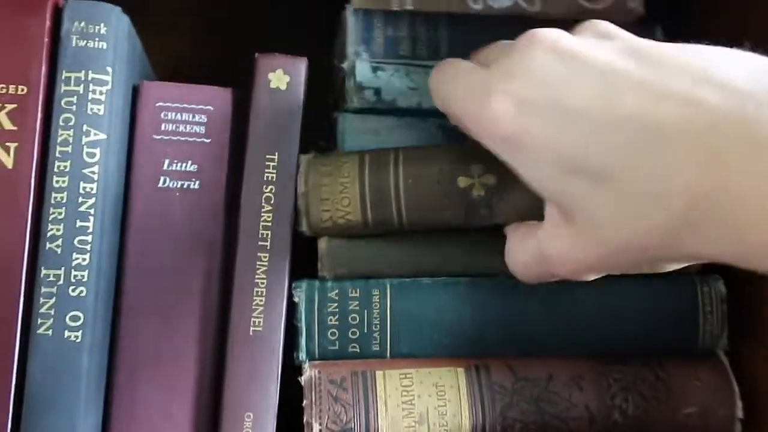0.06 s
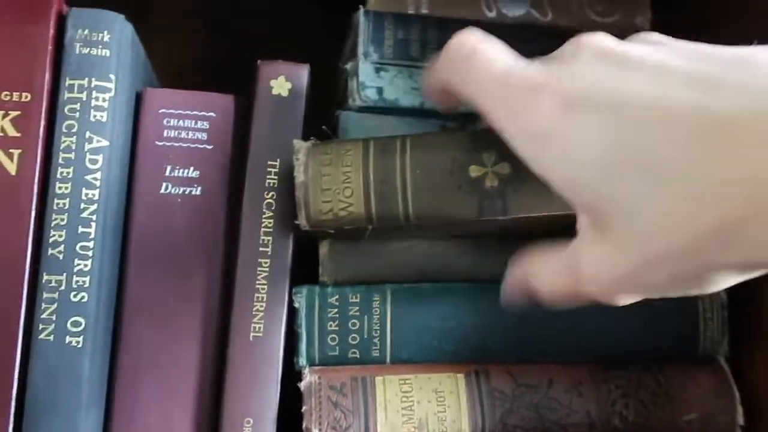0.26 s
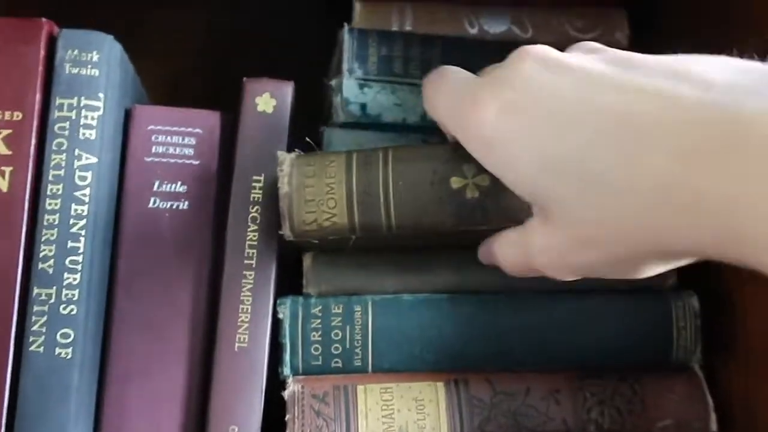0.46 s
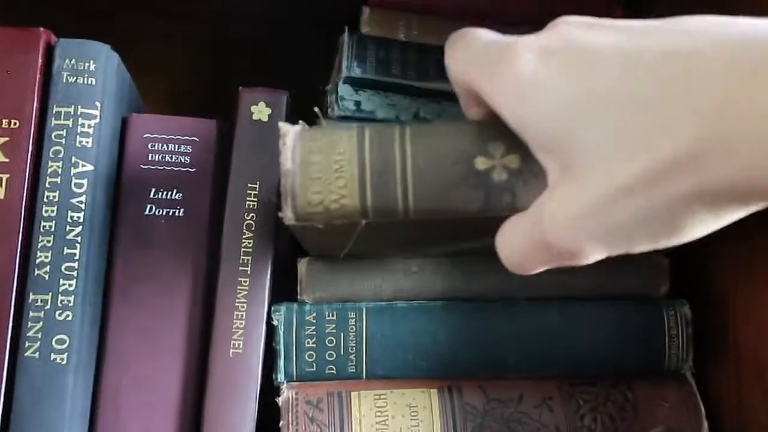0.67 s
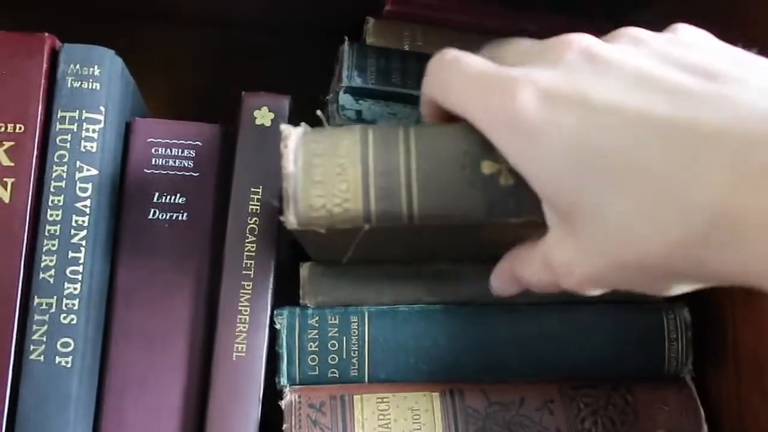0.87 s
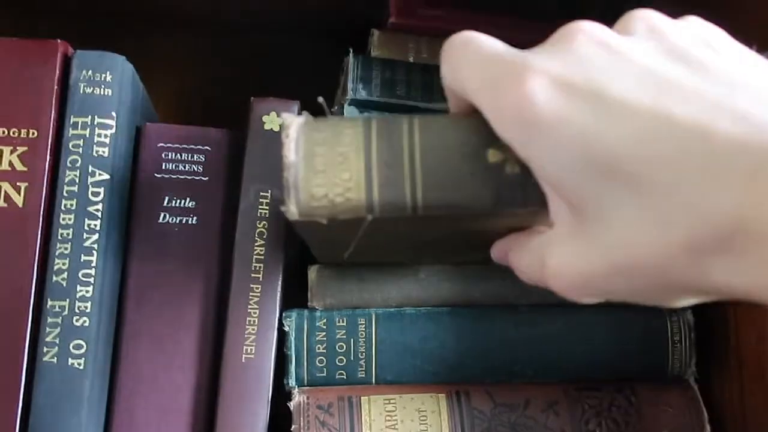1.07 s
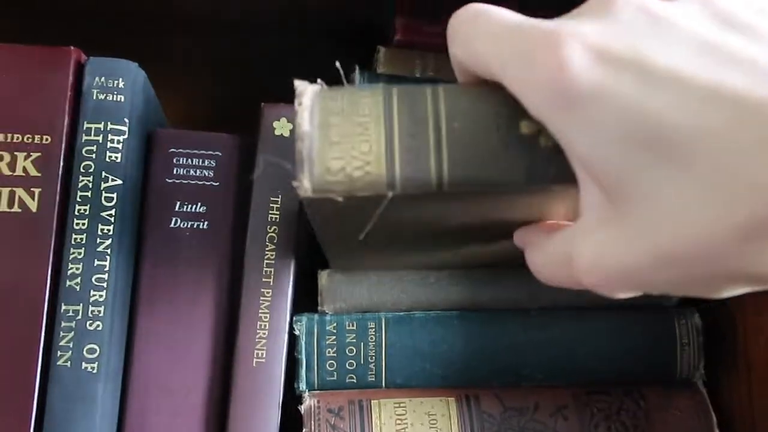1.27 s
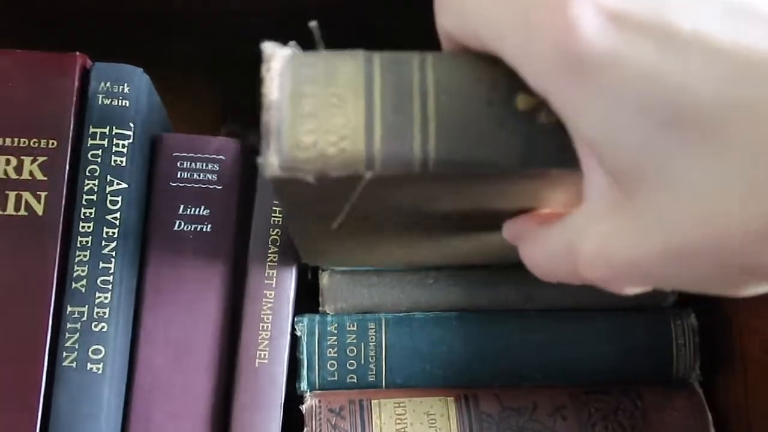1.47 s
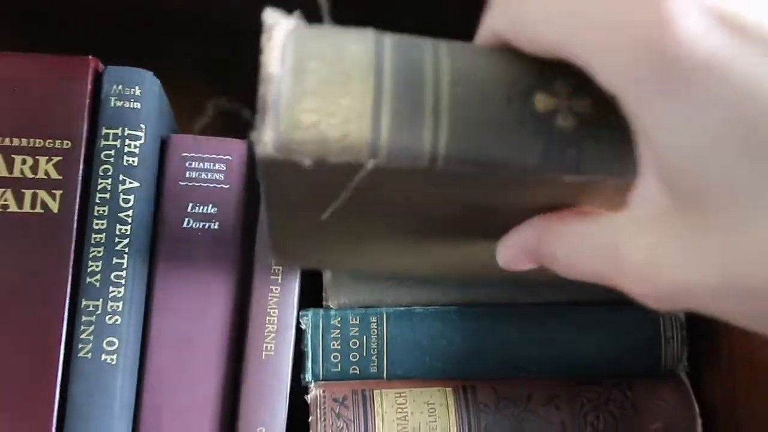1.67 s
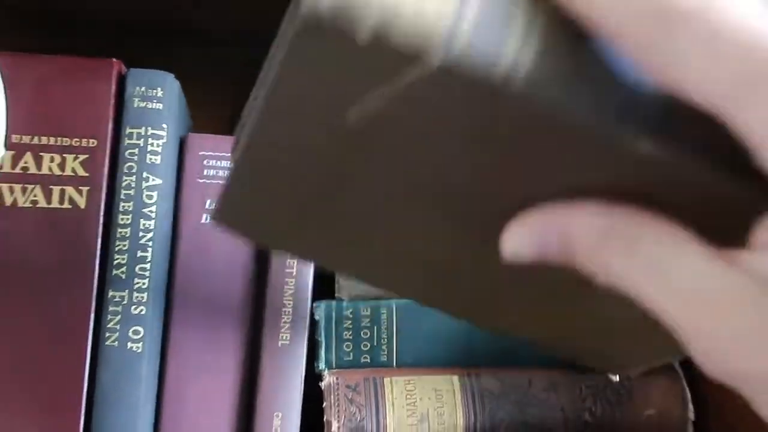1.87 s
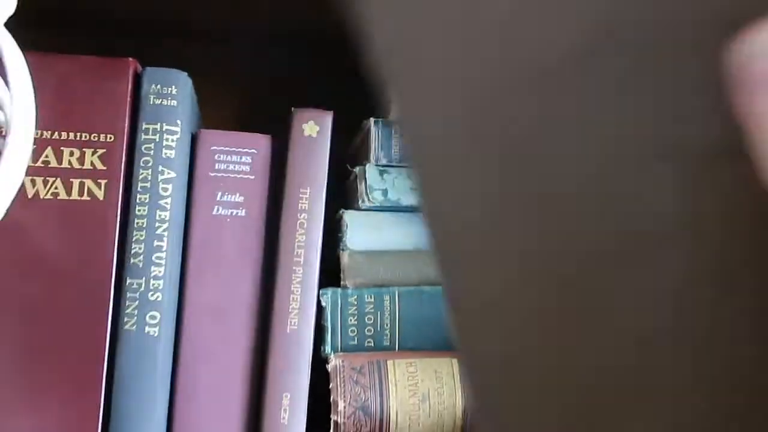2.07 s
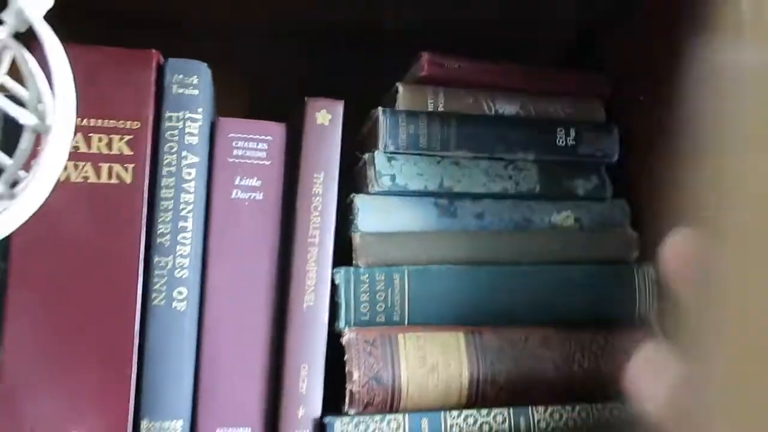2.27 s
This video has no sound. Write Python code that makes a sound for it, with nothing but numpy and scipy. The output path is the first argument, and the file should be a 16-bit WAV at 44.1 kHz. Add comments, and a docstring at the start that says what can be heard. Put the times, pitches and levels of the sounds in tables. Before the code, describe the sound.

A hardcover book is worked out of a tight stack: a burst of heavy knocks, smaller thumps in the middle, light cloth scraping, then one strong double thud and near quiet. Close stereo microphone, small furnished room.

```python
"""A low rubbing rumble and a burst of knocks open the scene: a hardcover book is worked out of a tight stack
on a wooden shelf, close by. Rumble and cloth hiss are filtered noise that follows pressure and speed.
Knocks are damped sines with ringing modes, binding ticks are short noise bursts, one squeak is a rising sine,
and the ribs of the cloth rasp as narrow-band noise. A small room adds a short tail, quiet air and a hum."""
import sys
import numpy as np
from scipy import signal
from scipy.fft import rfft, irfft
from scipy.io import wavfile

SR = 44100
rng = np.random.default_rng(int(sys.argv[2]) if len(sys.argv) > 2 else 0)


def transcribe(u):
    """Save the signal u as a 16-bit wav file named by the first command-line argument.

    u: samples, shape (n,) or (channels, n), limited to [-1, 1]; the rate is SR.
    q: integer samples, one column per channel.
    """
    v = np.clip(np.atleast_2d(u).T, -1, 1)
    q = np.round(v * 32767).astype(np.int16)
    wavfile.write(sys.argv[1], SR, q)


N = 102135  # length in samples


def amp(db):
    """Logarithmic level: converts decibels to an amplitude gain."""
    return 10 ** (np.asarray(db) / 20)


def unit(x):
    """Power normalisation: scales a signal to rms 1."""
    return x / np.sqrt(np.mean(x ** 2) + 1e-20)


def at_hz(points, hz):
    """Interpolation on a logarithmic frequency axis: reads a curve of (f, value) points."""
    f, value = np.transpose(points)
    return np.interp(np.log(hz + 1), np.log(f + 1), value)


def level(points):
    """Amplitude envelope: gain at every sample from a curve of (t/s, level/dB) points."""
    times, db = np.transpose(points)
    return amp(np.interp(np.arange(N) / SR, times, db))


def add(mix, start_s, sound):
    """Superposition: adds a sound to the mix, in place, from its start time."""
    part = mix[..., max(round(start_s * SR), 0):][..., :sound.shape[-1]]
    part += sound[..., :part.shape[-1]]


def colour(x, points):
    """Spectral shaping: filters a signal by a curve of (f/Hz, level/dB) points, then sets rms 1."""
    n = x.shape[-1]
    gain = amp(at_hz(points, np.fft.rfftfreq(n, 1 / SR)))
    return unit(irfft(rfft(x) * gain, n))


def spread(pair, diffuse=False):
    """Interaural coherence: mixes two unrelated signals to a set left-right likeness at each frequency."""
    # left-right likeness of near sounds: f/Hz, likeness (0 to 1)
    near_likeness = [(400, 0.99), (2000, 0.89), (4500, 0.8), (10000, 0.29), (15000, 0.41)]
    diffuse_hz = 427  # room sound is alike below this and differs above it
    n = pair.shape[-1]
    hz = np.fft.rfftfreq(n, 1 / SR)
    if diffuse:
        same = 1 / (1 + (hz / diffuse_hz) ** 3)
    else:
        same = at_hz(near_likeness, hz)
    mid, side = rfft(pair) * np.sqrt([(1 + same) / 2, (1 - same) / 2])
    return irfft(np.array([mid + side, mid - side]), n)


def wander(rate_hz):
    """Low-pass random process: chance variation up to a rate, at rms 1."""
    hz = np.fft.rfftfreq(N, 1 / SR)
    noise = rfft(rng.standard_normal(N))
    return unit(irfft(noise / (1 + (hz / rate_hz) ** 4), N))


def stack_rumble():
    """Friction under load: the pressed stack rubs as low noise whose level follows the pressure."""
    # pressure on the stack as the relative level of its rumble: t/s, level/dB
    pressure = [(0, -16), (.035, -38.5), (.08, -33.5), (.1, -41.5), (.21, -39.5), (.28, -42.5), (.34, -57),
                (.42, -67), (.5, -45.5), (.56, -46.5), (.64, -37.5), (.69, -33.5), (.76, -42), (.83, -38),
                (.92, -54), (.98, -44), (1.03, -55), (1.07, -44.5), (1.19, -45.5), (1.28, -50.5),
                (1.39, -44), (1.47, -35.5), (1.5, -56), (1.54, -43), (1.57, -61), (1.61, -46.5),
                (1.65, -94), (2.1, -59), (2.32, -52.5)]
    # spectrum of the rumble, before scaling to rms 1: f/Hz, level per Hz/dB
    rumble_spectrum = [(25, -57), (60, 11.5), (110, -7), (190, 3.5), (290, 3), (450, -5.5), (700, -7),
                       (1100, -24.5), (5000, -52)]
    rumble_db, flutter_db = 2.5, 2
    noise = colour(spread(rng.standard_normal((2, N))), rumble_spectrum)
    return noise * level(pressure) * amp(rumble_db + flutter_db * wander(rate_hz=160))


def patchy(x):
    """Shifting contact spots: each band of the friction swells and fades by itself."""
    patch_db, patch_rate_hz = 1.9, 9.2
    z, hz = rfft(x), np.fft.rfftfreq(N, 1 / SR)
    centres = np.geomspace(700, 15000, 16)  # Hz
    out = np.zeros((2, N))
    for peak in np.eye(len(centres)):
        # overlapping triangular bands that sum to the full spectrum
        band = irfft(z * np.interp(hz, centres, peak), N)
        out += band * amp(patch_db * wander(patch_rate_hz))
    return out


def through_gap(x):
    """Cavity resonance: the gap between the books rings; its muffling lifts as the book comes out."""
    # resonances of the narrow gap: f/Hz, boost/dB
    gap_modes = [(1560, 1), (2550, 1), (3400, 2), (4470, 5.5)]
    gap_width_hz = 38  # half-width of each boost
    treble_hz, brighten_db_per_s = 3000, 3
    hz = np.fft.rfftfreq(N, 1 / SR)
    boost_db = sum(db / (1 + ((hz - f) / gap_width_hz) ** 2) for f, db in gap_modes)
    z = rfft(x) * amp(boost_db)
    low = 1 / (1 + (hz / treble_hz) ** 2)
    bass, treble = irfft(z * low, N), irfft(z * (1 - low), N)
    # the treble rises steadily and reaches its unchanged level at 2 s
    return bass + treble * amp(brighten_db_per_s * (np.arange(N) / SR - 2))


def cover_hiss():
    """Granular friction: slipping cloth fibres make a dense hiss of random grains over steady noise."""
    # speed of the sliding cover as the relative level of its hiss: t/s, level/dB
    speed = [(0, -41), (.045, -66.5), (.08, -48.5), (.125, -41.5), (.15, -51.5), (.23, -49), (.28, -54.5),
             (.33, -74), (.52, -64), (.55, -47), (.69, -47), (.75, -43), (.78, -55), (.85, -62),
             (1.02, -62), (1.07, -52), (1.28, -51), (1.385, -45.5), (1.42, -49.5), (1.455, -58),
             (1.48, -102), (1.73, -69.5), (1.81, -56.5), (1.87, -61), (1.94, -54), (2.01, -57.5),
             (2.06, -62), (2.32, -64.5)]
    # spectrum of the hiss, before scaling to rms 1: f/Hz, level per Hz/dB
    hiss_spectrum = [(200, -29), (700, 12.5), (1700, 7.5), (2800, 10.5), (4500, 7), (7000, 5), (9500, 0.5),
                     (12500, 0), (15500, -13)]
    grains_per_s, grain_spread_db = 1200, 2.5
    grain_share, flutter_db = 0.32, 1.7  # grains' share of the power; random level variation in dB
    strength = amp(grain_spread_db * np.minimum(rng.exponential(1, (2, N)), 5))
    grains = strength * rng.choice([-1, 1], (2, N))
    grains = grains * (rng.random((2, N)) < grains_per_s / SR)
    noise = rng.standard_normal((2, N))
    slips = np.sqrt(grain_share) * unit(grains) + np.sqrt(1 - grain_share) * noise
    friction = patchy(colour(spread(slips), hiss_spectrum))
    return through_gap(friction) * level(speed) * amp(flutter_db * wander(rate_hz=15))


def background():
    """Diffuse field and frequency modulation: wide room air with a faint hum of wavering tones."""
    # spectrum of the air, before scaling to rms 1: f/Hz, level per Hz/dB
    air_spectrum = [(15, -46), (25, -13), (49, -2.5), (167, -14.5), (293, -8.5), (588, -18.5), (856, -20),
                    (1960, -28), (5140, -38.5), (10000, -49), (15000, -56)]
    # tones of the hum: f/Hz, rms level/dB
    hum_tones = [(58, -58.5), (207, -59.5), (358, -84)]
    air_db = -53.5
    hum = np.zeros(N)
    for hz, db in hum_tones:
        phase = 2 * np.pi * np.cumsum(hz + 3 * wander(rate_hz=11.0)) / SR
        hum += amp(db) * np.sqrt(2) * np.sin(phase)
    air = colour(spread(rng.standard_normal((2, N)), diffuse=True), air_spectrum)
    return hum + amp(air_db) * air


def burst(t, gain, decay):
    """Impulsive noise: a dying cluster of tiny snaps with an imposed, even magnitude spectrum."""
    envelope = np.exp(-t / decay)
    z = rfft(spread(rng.standard_normal((2, len(t)))) * envelope)
    # keep the phases alone, so the magnitude is the given gain
    snaps = irfft(z / (abs(z) + 1e-20) * gain, len(t))
    snaps = snaps * np.exp(-(t / (10 * decay)) ** 2)
    return unit(snaps) * np.sqrt(np.mean(envelope ** 2))


def ring(t, modes, scale=1):
    """Modal synthesis: a sum of sines, each decaying by 60 dB in its t60."""
    return sum(amp(db - 60 * t / t60) * np.sin(2 * np.pi * f * scale * t) for f, db, t60 in modes)


def knocks():
    """Impact excitation: each knock is a damped thud, a clack of board and shelf modes, and a crunch."""
    # knocks: t/s, level/dB, thud f/Hz, thud rise/s, thud decay/s,
    # clack level relative to the thud/dB, cover board f/Hz
    knock_list = [(0.0158, -7, 165.7, 0.0049, 0.018, -68, 452), (0.0239, 10, 298, 0.0017, 0.0015, -25, 430),
                  (0.0371, -10.5, 174, 0.00049, 0.013, -11.5, 388),
                  (0.139, 7, 270, 0.0013, 0.005, -8.5, 675), (0.1625, -4.5, 247, 0.0022, 0.0054, -21, 680),
                  (0.193, -17, 308, 0.00082, 0.0029, -7, 630), (0.263, -40, 400, 0.0012, 0.0018, 4, 925),
                  (0.4359, -28.5, 251, 0.00028, 0.013, -13.5, 577),
                  (0.5179, -1, 197, 0.0031, 0.0021, -54, 415),
                  (0.529, -10.5, 188, 0.0013, 0.0023, -59, 417),
                  (0.681, -6.5, 264, 0.0083, 0.009, -42, 500),
                  (0.7680, 0.5, 483, 0.00051, 0.0015, -13, 802),
                  (0.7795, -1.5, 323, 0.0026, 0.0033, -13, 715),
                  (0.791, -8.5, 230, 0.0042, 0.0065, -11, 696),
                  (0.829, -21.5, 493, 0.0029, 0.0086, -8.5, 568),
                  (1.4411, 13, 189.5, 0.0036, 0.0031, -39, 568),
                  (1.4448, -6, 185, 0.0033, 0.0061, -5.5, 544),
                  (1.4530, 7.5, 267, 0.0018, 0.0033, -20.5, 619),
                  (1.521, -16, 430, 0.0031, 0.0039, -12.5, 598)]
    # heavily damped modes of the cover board: multiple of its f, level/dB, t60/s
    board_modes = [(1, 10, 0.026), (1.92, -8, 0.03), (2.08, -18, 0.059), (2.44, -14, 0.025),
                   (3.37, -28, 0.0236), (3.74, -22, 0.041), (5.0, -31.5, 0.02)]
    # modes of the wooden shelf: f/Hz, level/dB, t60/s
    shelf_modes = [(137.5, -20.5, 0.22), (193.3, -7, 0.23), (326, -7.5, 0.083), (394.6, 1.5, 0.061),
                   (1019, -14.5, 0.038)]
    # crunch of cloth and card at each contact, relative spectrum: f/Hz, level per Hz/dB
    crunch_spectrum = [(100, -53), (400, 14.5), (800, 0), (1500, 1), (2100, -17.5), (3500, -18.5),
                       (6000, -37), (15000, -61.5)]
    board_db, shelf_db, crunch_db = -7, -6, -7
    crunch_decay_s, clack_rise_s = 0.0046, 0.0011
    out, t = np.zeros((2, N)), np.arange(SR // 3) / SR
    crunch_gain = amp(at_hz(crunch_spectrum, np.fft.rfftfreq(len(t), 1 / SR)))
    shelf = ring(t, shelf_modes)
    for start_s, db, hz, rise, decay, clack_db, board_hz in knock_list:
        envelope = (1 - np.exp(-(t / rise) ** 2)) * np.exp(-t / decay)
        thud = envelope * np.sin(2 * np.pi * hz * t)
        board = ring(t, board_modes, board_hz)
        crunch = burst(t, crunch_gain, crunch_decay_s)
        clack = amp(board_db) * board + amp(shelf_db) * shelf + amp(crunch_db) * crunch
        clack = clack * (1 - np.exp(-t / clack_rise_s))
        add(out, start_s, amp(db) * (thud + amp(clack_db) * clack))
    return out


def ticks():
    """Sudden release: edges of the binding catch and snap free as short band-limited bursts."""
    # ticks of the binding: t/s, level/dB, centre f/Hz, width/octaves, decay/s
    tick_list = [(0.2046, -33, 3600, 0.35, 0.00088), (0.2621, -40.5, 1880, 0.25, 0.0051),
                 (0.4324, -47.5, 2030, 0.25, 0.0018), (0.5009, -32.5, 2870, 0.42, 0.0019),
                 (0.768, -22, 1530, 0.14, 0.0024), (0.8102, -33, 1550, 0.088, 0.0067),
                 (0.811, -37, 2450, 0.066, 0.0038), (0.811, -50.5, 3680, 0.045, .005),
                 (1.397, -33, 4000, 0.98, 0.0053), (1.442, -40.5, 3000, 0.38, 0.0062),
                 (1.453, -37, 2400, 0.98, 0.0038), (1.522, -49.5, 2940, 0.77, 0.0038)]
    out, t = np.zeros((2, N)), np.arange(SR // 2) / SR
    f = np.fft.rfftfreq(len(t), 1 / SR) + 1
    for start_s, db, hz, octaves, decay in tick_list:
        band = np.exp(-.5 * (np.log2(f / hz) / octaves) ** 2)
        onset = 1 - np.exp(-(t * hz) ** 2)
        add(out, start_s, amp(db) * burst(t, band, decay) * onset)
    return out


def squeak():
    """Stick-slip friction: the cover's uneven slipping is one short rising sine with jittered pitch."""
    start_s, length_s = .868, .022
    from_hz, to_hz, squeak_db, jitter = 310, 714, -28, 0.051  # jitter is an rms fraction of the pitch
    out, u = np.zeros(N), np.arange(0, 1, 1 / (length_s * SR))  # u runs from 0 to 1 along the squeak
    glide_hz = from_hz + (to_hz - from_hz) * np.sin(np.pi * u / 2)
    hz = glide_hz * (1 + jitter * wander(from_hz)[:len(u)])
    chirp = np.sin(2 * np.pi * np.cumsum(hz) / SR)
    add(out, start_s, amp(squeak_db) * np.sin(np.pi * u) * chirp)
    return out


def weave():
    """Narrow-band noise: on the long pull, the cloth's ribs catch unevenly and rasp in a sinking band."""
    # level of the rasp: t/s, level/dB
    rasp_level = [(1.0, -115), (1.12, -88), (1.25, -57), (1.33, -51), (1.37, -54.5), (1.5, -100)]
    # the centre sinks from middle + sag to middle - sag
    middle_hz, sag_hz, sag_at_s, sag_time_s = 2740, 220.3, 1.29, 0.0407
    width_hz, flutter_db = 950, 1
    hz = middle_hz - sag_hz * np.tanh((np.arange(N) / SR - sag_at_s) / sag_time_s)
    turn = 2 * np.pi * np.cumsum(hz) / SR
    # two slow noises on a carrier in quadrature make one band of noise around it
    rasp = wander(width_hz / 2) * np.cos(turn) + wander(width_hz / 2) * np.sin(turn)
    return level(rasp_level) * rasp * amp(flutter_db * wander(rate_hz=76))


def room(x):
    """Reverberation: convolves with decaying noise, the short tail of a furnished room."""
    # decay of the room: f/Hz, t60/s
    room_decay = [(100, 0.17), (300, 0.3), (700, 0.32), (2000, 0.39), (8000, 0.15)]
    room_db, side_db, rise_s = -15.5, -19.5, 0.0061  # side_db is relative to the middle
    count = SR // 2
    t = np.arange(count) / SR
    hz, times, z = signal.stft(rng.standard_normal((2, count)), SR, nperseg=256)
    decay = amp(-60 * times / at_hz(room_decay, hz)[:, None])
    tail = signal.istft(z * decay, SR, nperseg=256)[1][:, :count]
    mid, side = amp(room_db) * unit(tail * np.minimum(t / rise_s, 1)) / np.sqrt(count)
    response = spread(np.array([mid, amp(side_db) * side]), diffuse=True)
    return signal.fftconvolve(x, response, axes=1)[:, :N]


def scene():
    """Superposition: the direct sound of the book and shelf, its reverberation and the background."""
    book = stack_rumble() + cover_hiss() + knocks() + ticks() + squeak() + weave()
    return book + room(book) + background()


def record(dry):
    """Saturation and band limiting: peaks overload the recorder smoothly, then a low-pass filter acts."""
    ceiling, edge_hz = 1, 15700
    clipped = dry / (1 + (dry / ceiling) ** 8) ** (1 / 8)
    lowpass = signal.firwin(255, edge_hz, window=("kaiser", 9), fs=SR)
    return signal.oaconvolve(clipped, lowpass[None], "same")


dry = scene()
out = record(dry)
transcribe(out)
```